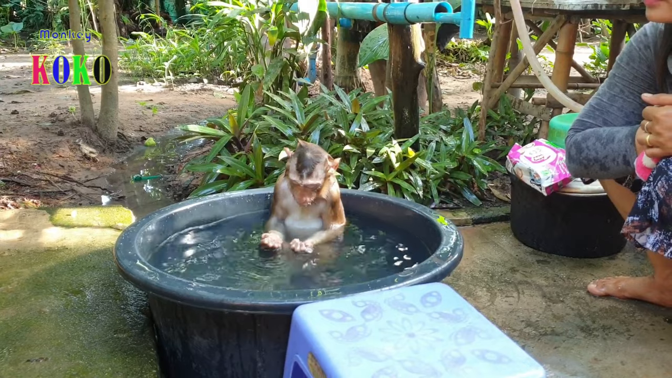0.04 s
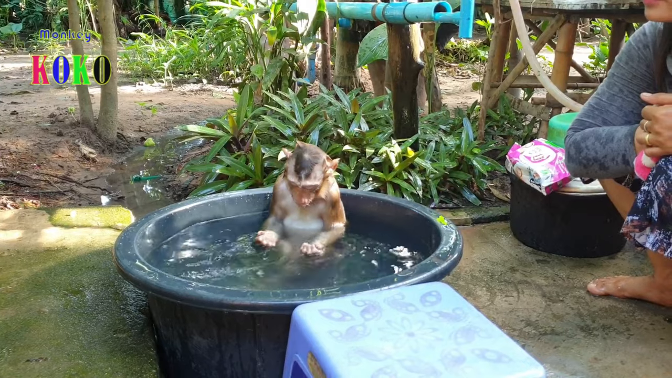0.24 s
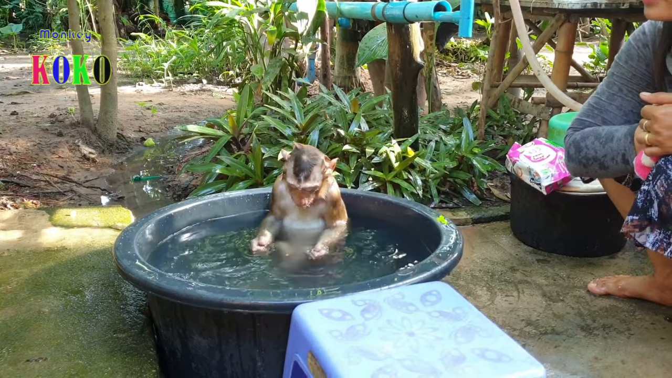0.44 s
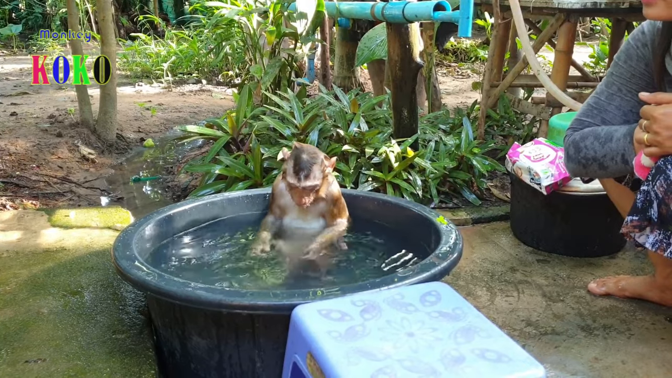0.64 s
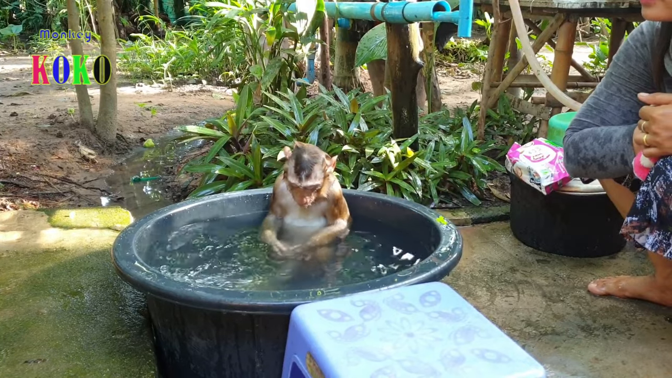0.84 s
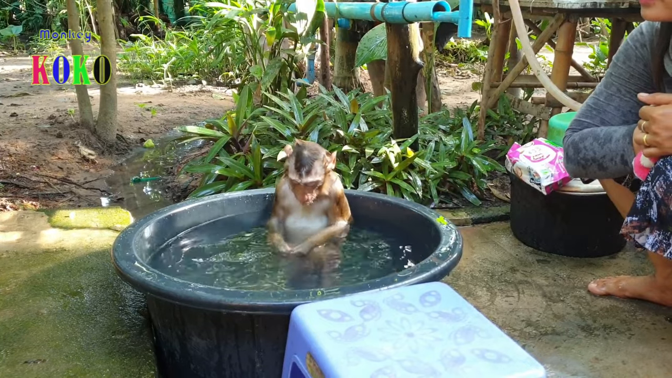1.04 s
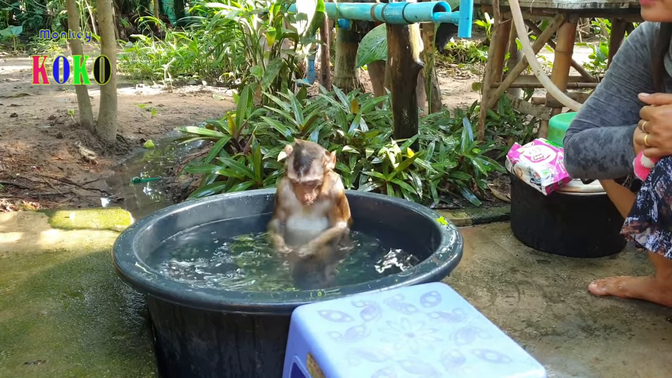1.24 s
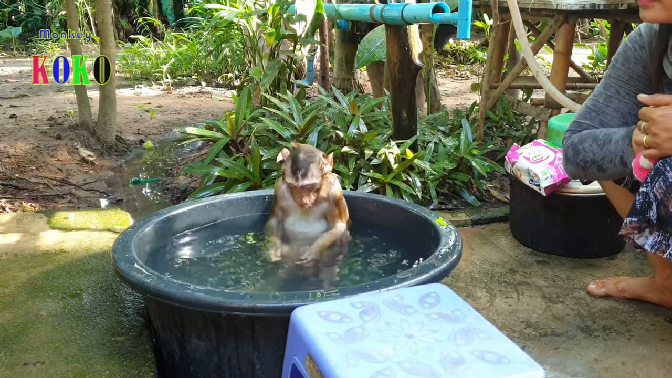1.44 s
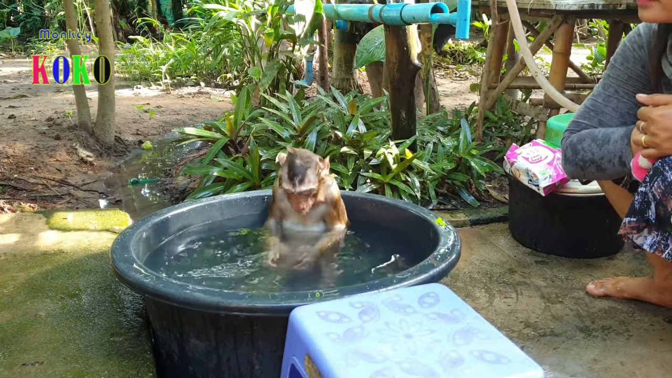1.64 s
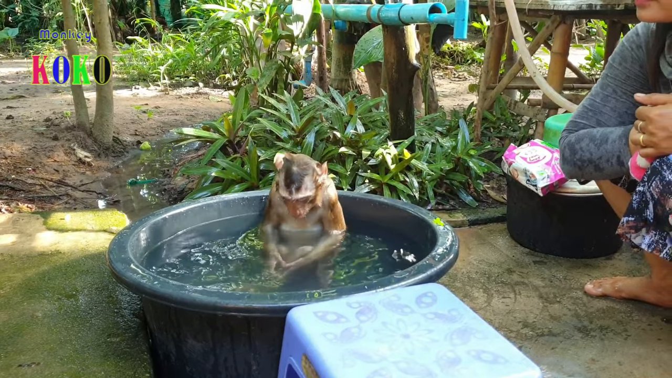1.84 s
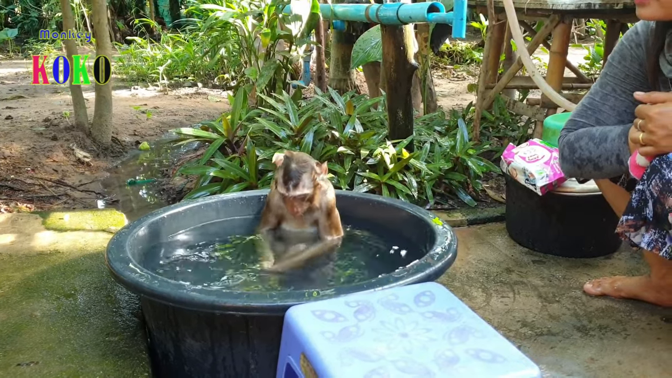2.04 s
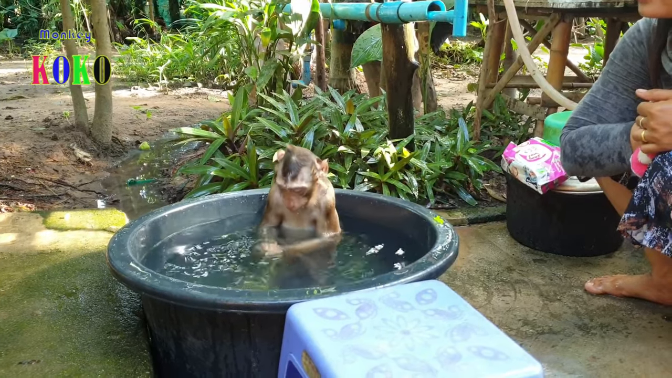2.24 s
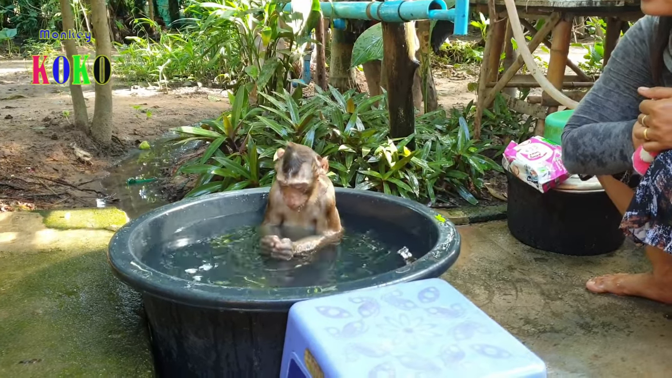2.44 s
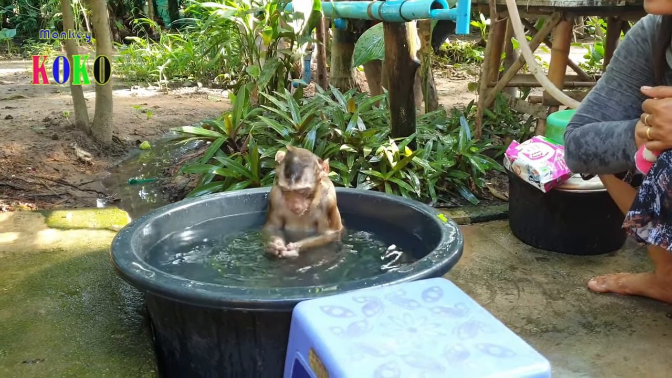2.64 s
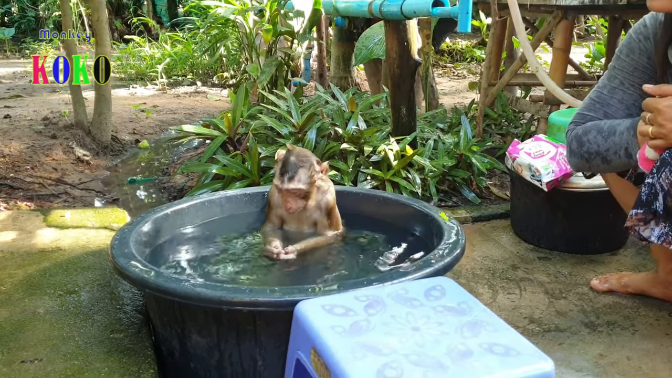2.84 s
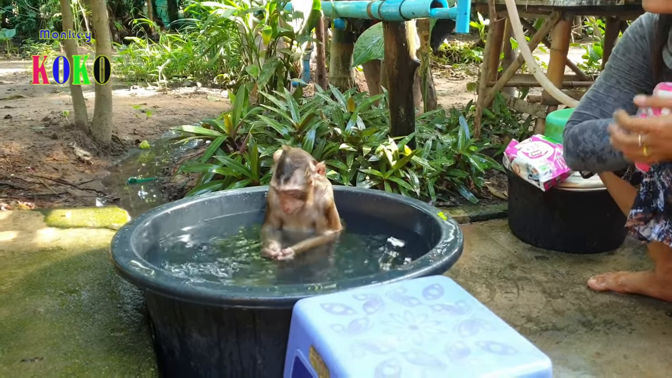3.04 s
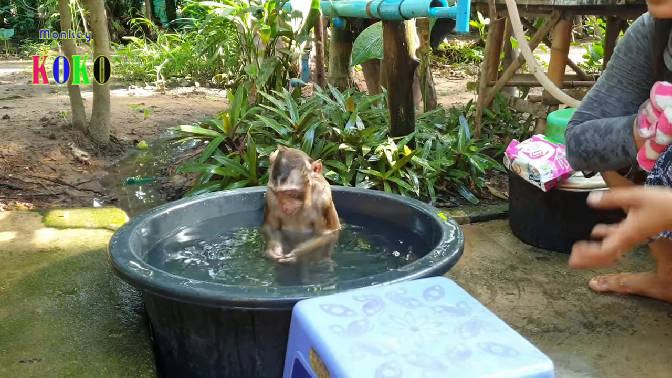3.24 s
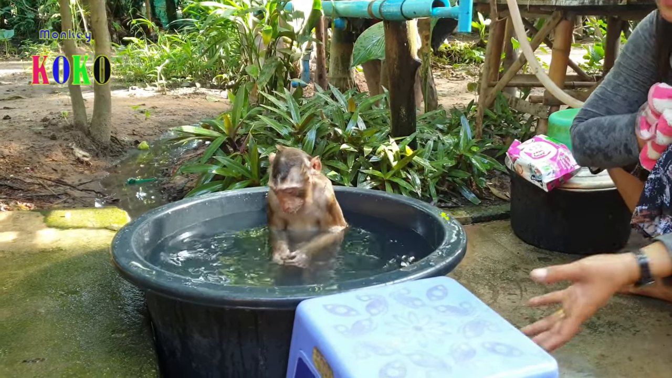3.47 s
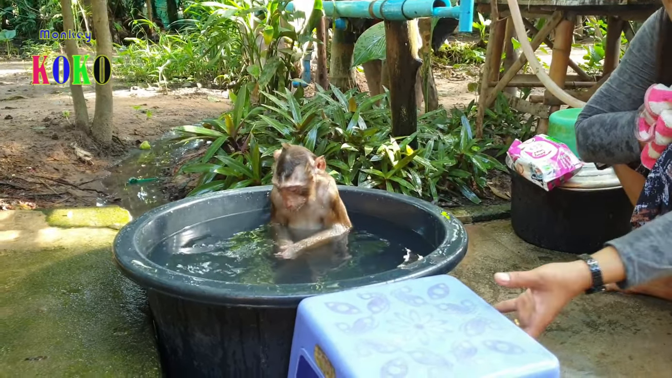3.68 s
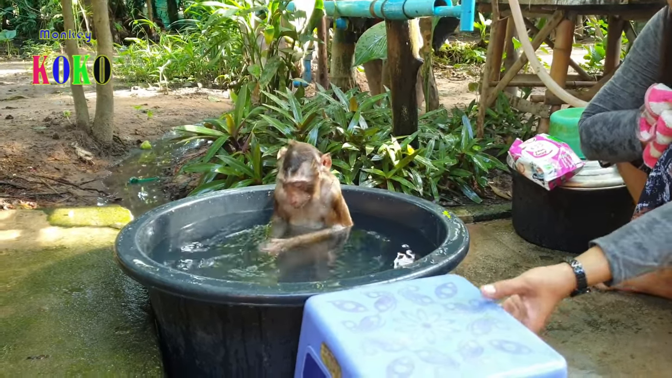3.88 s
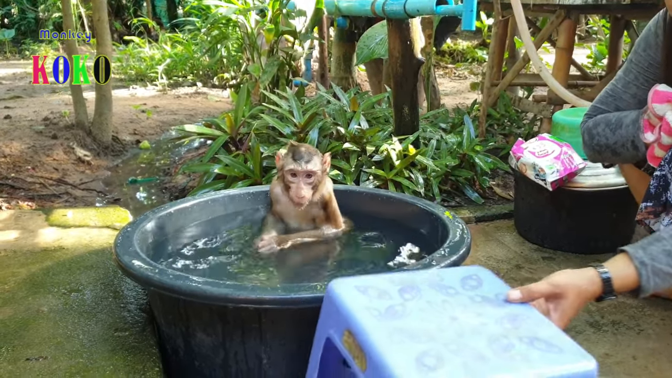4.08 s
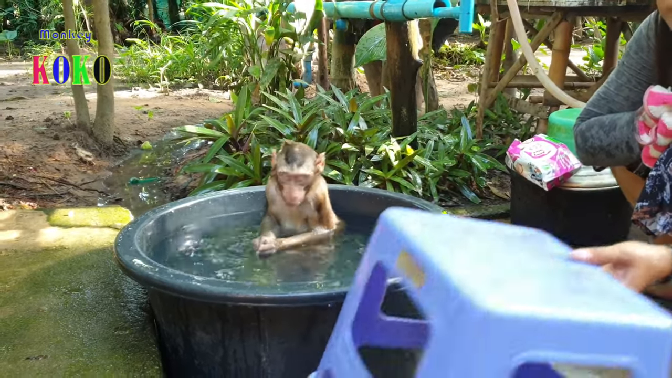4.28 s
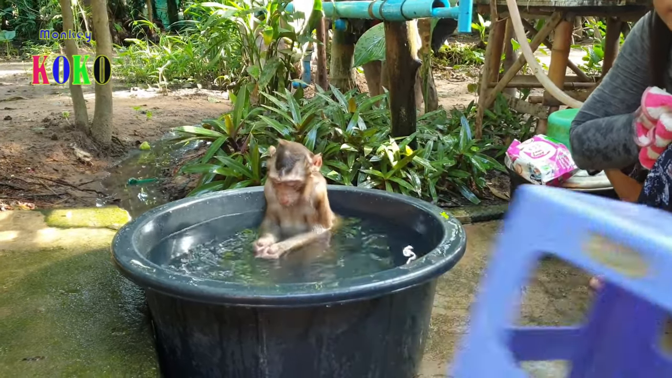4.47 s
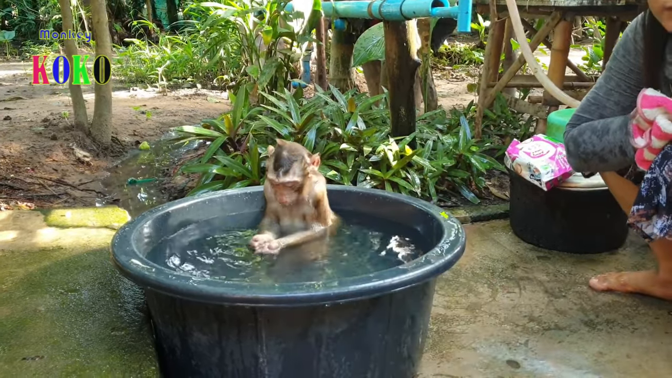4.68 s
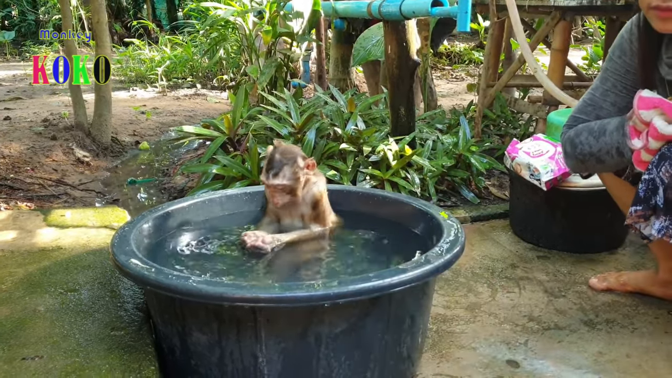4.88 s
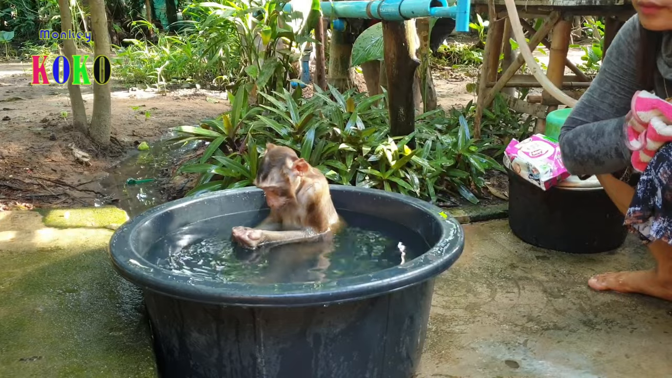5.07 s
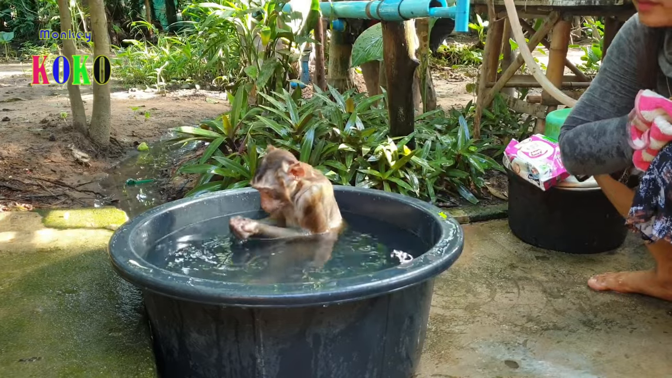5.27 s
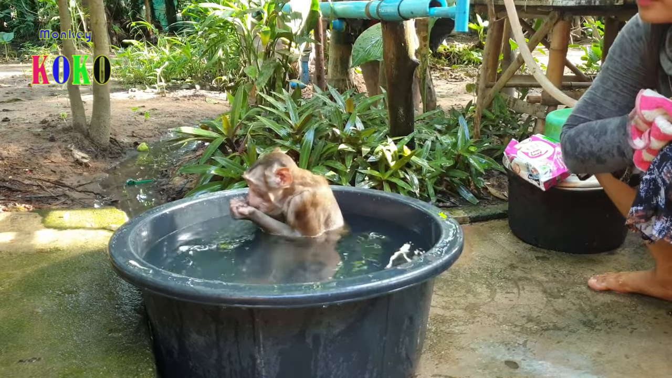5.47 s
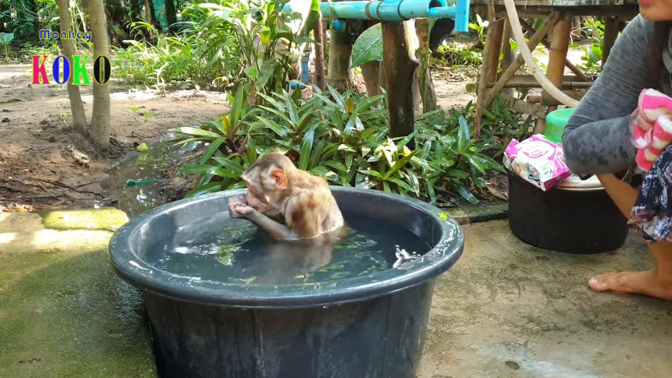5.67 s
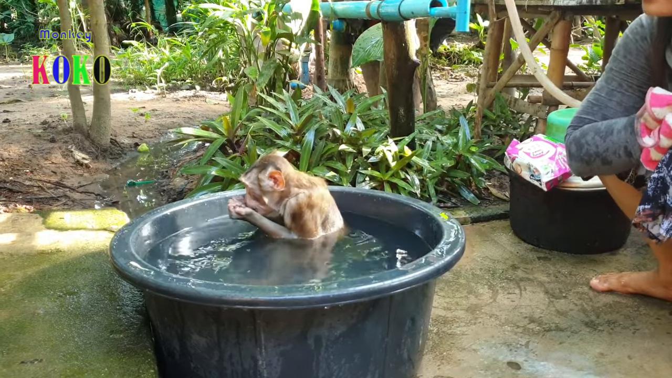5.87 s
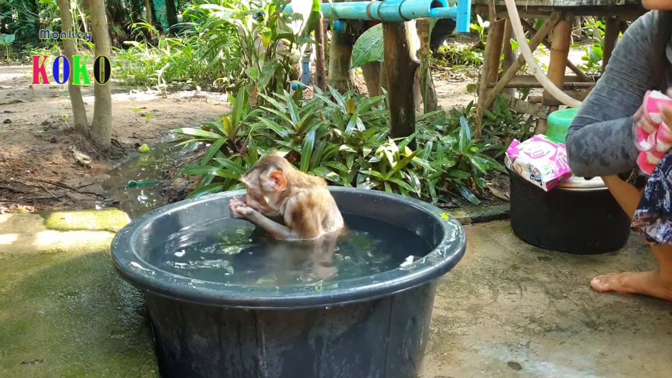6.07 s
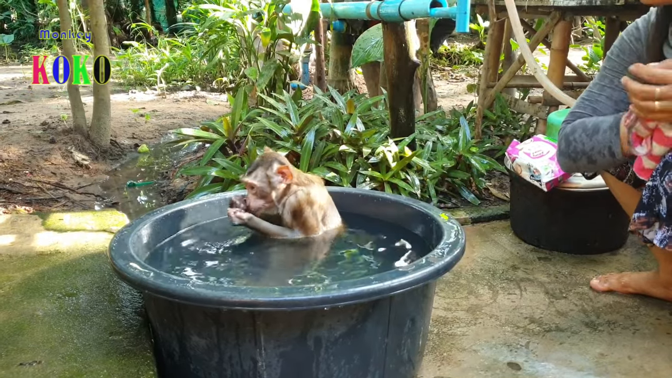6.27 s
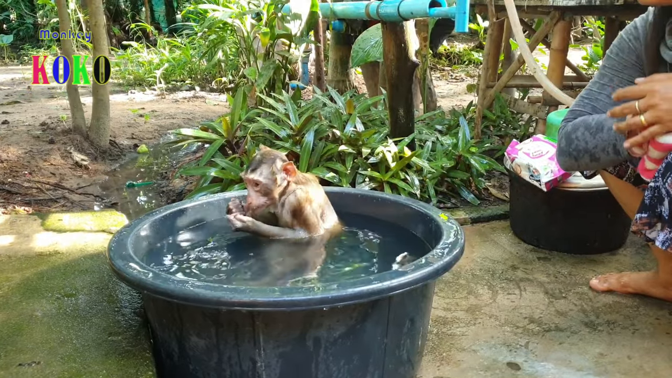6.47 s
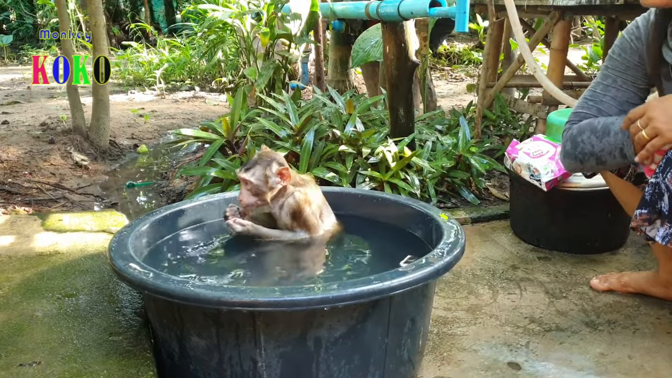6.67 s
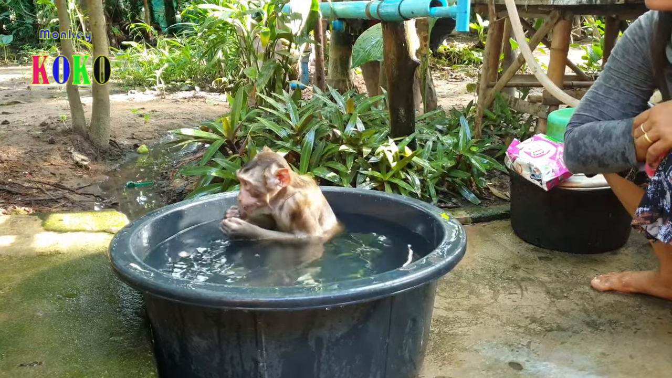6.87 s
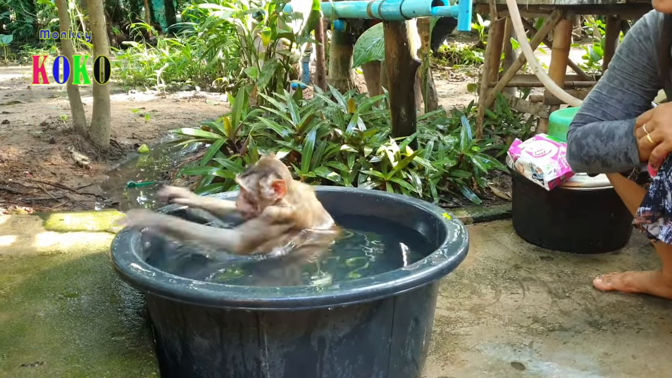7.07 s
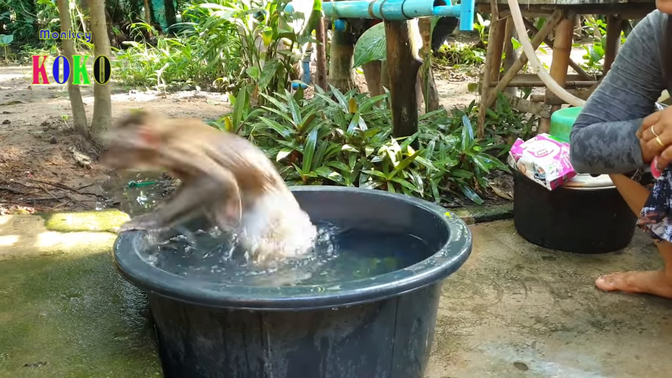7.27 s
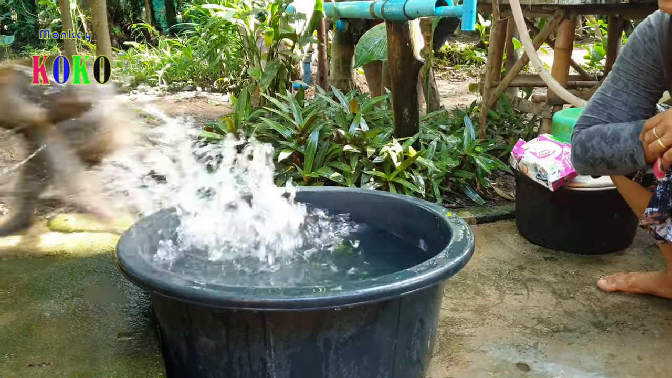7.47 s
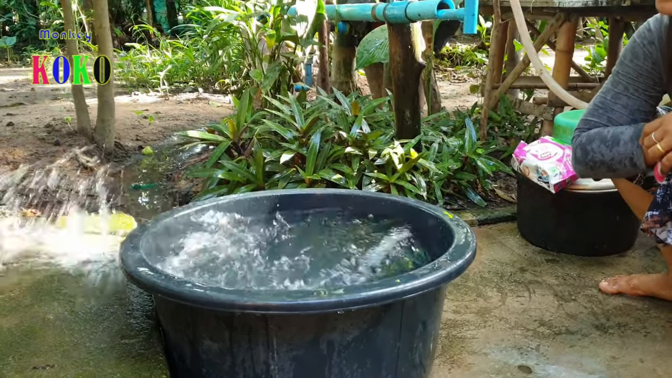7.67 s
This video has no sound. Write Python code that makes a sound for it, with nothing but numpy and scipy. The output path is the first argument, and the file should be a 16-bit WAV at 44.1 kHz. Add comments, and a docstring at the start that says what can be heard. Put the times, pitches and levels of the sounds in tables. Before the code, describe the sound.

Outdoors in a calm garden, a bird repeats a raspy falling chirp over three times a second while another hoots softly far away. Faint insects and a low distant engine lie beneath. Clothes rustle nearby; a plastic stool clacks as it is picked up and thuds and scrapes when set down. Near the end a small monkey leaps from a water tub with a loud, bubbly splash and spray, slightly left of the stereo microphones.

```python
"""A young monkey leaps out of a plastic tub in a garden with a loud splash: noise slaps, ringing bubbles and spray.
Before that someone close by shifts in rustling clothes (swelling grainy noise) and moves a plastic stool,
whose knocks ring decaying modes and whose feet drag. A bird repeats a falling chirp in the trees and another
hoots far off, both gliding tones smeared by reflections. Narrow bands of noise make the insects
and a distant engine, over coloured noise for the still air."""
import sys
import numpy as np
from scipy import signal
from scipy.fft import rfft, irfft, next_fast_len
from scipy.io import wavfile
from scipy.ndimage import uniform_filter1d

SR = 44100
rng = np.random.default_rng(int(sys.argv[2]) if len(sys.argv) > 2 else 0)


def wrap_up_sound(samples):
    """Save the sound to the file named by the first command line argument, as 16-bit audio."""
    columns = np.atleast_2d(samples).T
    # keep every value between -1 and 1, then stretch to whole-number steps
    tamed = np.clip(columns, -1, 1)
    steps = np.round(tamed * 32767).astype(np.int16)
    wavfile.write(sys.argv[1], SR, steps)


N = 340445
TIME = np.arange(N) / SR

# Surges of water: a stir, the leap, the water falling back.
# Each row: peak in seconds, then levels of big bubbles, small bubbles and spray in dB, ahead of the tub's walls.
WATER_SURGES = [(7.16, -62.5, -63, -58.5), (7.33, -36.5, -34.5, -36.5), (7.677, -52, -55, -32.5)]
BIG_RISE_S, BIG_FALL_S = 0.07, 0.43   # big bubbles: time to climb or drop 20 dB around a surge


def from_db(db):
    """Decibels to gain."""
    return 10 ** (np.asarray(db) / 20)


def rms_one(x):
    """Scale to unit power."""
    return x / np.sqrt(np.mean(x ** 2) + 1e-20)


def per_bin(points, size):
    """Read a (Hz, value) table at the FFT bins of a signal, on a log frequency scale."""
    hz, value = np.transpose(points)
    bins_hz = np.fft.rfftfreq(size, 1 / SR)
    return np.interp(np.log(bins_hz + 1), np.log(hz), value)


def colour(x, points):
    """Filter by a smooth (Hz, dB) spectrum."""
    size = next_fast_len(x.shape[-1] + SR // 10)
    spectrum = rfft(x, size) * from_db(per_bin(points, size))
    return irfft(spectrum, size)[..., :x.shape[-1]]


def diffuse(size):
    """White stereo noise from all around, alike in the bass and nearly unrelated in the treble."""
    # Likeness of the two microphones. Each row: frequency in Hz, left-right correlation.
    likeness = [(100, 0.91), (600, 0.59), (1200, 0), (2500, 0.075), (5000, 0)]
    padded = next_fast_len(size)
    mid, side = rfft(rng.standard_normal((2, padded)))
    alike = np.clip(per_bin(likeness, padded), -1, 1)
    shared = np.sqrt(1 + alike) * mid
    opposed = np.sqrt(1 - alike) * side * [[1], [-1]]
    return irfft(shared + opposed, padded)[:, :size]


def narrow_noise(hz, width_hz):
    """A wavering tone: noise through a narrow band."""
    edges = [max(hz - width_hz / 2, 10), hz + width_hz / 2]
    band = signal.butter(2, edges, "band", fs=SR, output="sos")
    return rms_one(signal.sosfilt(band, diffuse(N)))


def grainy(spectrum, per_s, spread_db):
    """Noise made of grains of uneven strength that start at once and die in milliseconds."""
    born = rng.random(N) < per_s / SR
    unevenness = np.clip(rng.standard_normal(N), -2.5, 2.5)
    power = born * from_db(spread_db * unevenness) ** 2
    decay = np.exp(-1 / (0.0017 * SR))
    envelope = np.sqrt(signal.lfilter([1], [1, -decay], power + 1e-4))
    return rms_one(colour(diffuse(N) * envelope, spectrum))


def add(track, s, sound):
    """Mix a short sound in at a time."""
    at = round(s * SR)
    part = sound[..., max(-at, 0):max(N - at, 0)]
    track[..., max(at, 0):max(at, 0) + part.shape[-1]] += part


def scatter(x, t60, build_s):
    """Countless small reflections that build up and die away; the response has unit energy."""
    t = TIME[:SR]
    response = diffuse(SR) * from_db(-60 * t / t60) * (1 - np.exp(-t / build_s))
    response /= np.sqrt(np.sum(response ** 2, axis=1, keepdims=True))
    return signal.fftconvolve(np.atleast_2d(x), response, axes=1)[:, :N]


def swell(s, rise, fall, hold=0):
    """Gain that peaks at a moment and may hold; 20 dB lower a rise before and a fall after."""
    distance = np.maximum((s - TIME) / rise, (TIME - s - hold) / fall)
    return from_db(-20 * np.clip(distance, 0, 10))


def panned(x, left_db):
    """Lean to one side by a left-right level difference."""
    return x * from_db(np.array([[.5], [-.5]]) * left_db)


def whistle(shape, stretch, detune, overtone_db):
    """A gliding note with a weak octave and soft ends."""
    s, hz, db = np.transpose(shape)
    t = np.arange(0, s[-1] * stretch, 1 / SR) / stretch
    phase = 2 * np.pi * np.cumsum(np.interp(t, s, hz)) * (1 + detune) / SR
    tone = np.sin(phase) + from_db(overtone_db) * np.sin(2 * phase)
    return tone * from_db(np.interp(t, s, db)) * signal.windows.tukey(len(t), .15)


def garden():
    """Coloured noise for still air, noise bands on a far engine's harmonics and at the insects' pitches."""
    # Spectrum of the still air. Each row: frequency in Hz, relative level in dB.
    air_colour = [(30, -4.5), (55, 2), (120, -4.5), (200, -16.5), (350, -21), (600, -32.5), (1200, -35.5),
                  (2100, -40), (3400, -26), (4400, -35), (6200, -34), (8800, -46.5), (11200, -38),
                  (13500, -52), (16000, -46)]
    # Steady insects. Each row: centre in Hz, width in Hz, level in dB ahead of the microphones.
    insect_bands = [(1763, 230, -82.5), (5197, 270, -78.5), (6660, 660, -81.5)]
    air_db = -61
    firing_hz, engine_db = 56.62, -60.5   # engine_db is the lowest harmonic
    air = from_db(air_db) * rms_one(colour(diffuse(N), air_colour))
    engine = sum(from_db(engine_db - 3.57 * k ** 1.427) * narrow_noise((k + 1) * firing_hz, 18.9)
                 for k in range(5))
    insects = sum(from_db(db) * narrow_noise(hz, width) for hz, width, db in insect_bands)
    surge = np.cos(2 * np.pi * (TIME - .62) / 1.13)
    shrill = from_db(-82.5 + 4.3 * surge) * narrow_noise(7340, 530)   # one insect swells about once a second
    swish = from_db(-70.5) * swell(1.018, .15, .18) * narrow_noise(11300, 2420)   # a brief, very high swish
    return air + engine + insects + shrill + swish


def chirp_times():
    """Each run of chirps keeps its pace until the next one takes over."""
    # Runs of even chirping. Each row: first chirp in seconds, time between chirps in seconds.
    runs = [(-.075, .2985), (3.478, 0.27), (4.36, .292), (5.503, 0.28)]
    leap_s = WATER_SURGES[1][0]
    ends = [s for s, _ in runs[1:]] + [leap_s + runs[-1][1] / 2]   # the bird stops at the leap
    return np.concatenate([np.arange(s, end - period / 2, period) for (s, period), end in zip(runs, ends)])


def chirping_bird():
    """Each falling chirp arrives by many paths through the trees, which smear it into a rasp."""
    # Shape of one chirp. Each row: seconds from its start, pitch in Hz, relative level in dB.
    chirp = [(0, 3470, 3), (.016, 3880, -7.5), (.028, 3500, -1), (.045, 3050, -2), (.064, 2750, -8),
             (.088, 2230, -16.5)]
    lead_s, rasp = 0.0067, 0.39   # soft upstroke before the beat; depth of the flutter in the voice
    out, t, times = np.zeros((2, N)), TIME[:SR // 2], chirp_times()
    early = from_db(-60 * np.maximum(t - .05, 0) / 0.27) * (1 - np.exp(-t / 0.039))
    late = from_db(-16.5 - 60 * t / 0.89)
    echoes = early + late
    echoes /= np.sqrt(np.sum(echoes ** 2))
    flutter = 1 + rasp * narrow_noise(116, 154)[0]
    for s, (pace, pitch, effort) in zip(times, rng.standard_normal((len(times), 3))):
        note = from_db(.5 * effort) * whistle(chirp, 1 + 0.0491 * pace, .008 * pitch, overtone_db=-42)
        note = note * flutter[abs(round(s * SR)):][:len(note)]
        smeared = signal.fftconvolve(note[None], echoes * diffuse(len(t)), axes=1)
        add(out, s - lead_s, smeared)
    return out * from_db(np.interp(TIME, [1.8, 3.2], [-55.8, -53.8]))   # it grows a little louder


def hooting_bird():
    """Hoarse arched notes, heard only through the trees: a pickup, a long hoot, then any short ones, fading."""
    # Shape of one hoot. Each row: share of its length, pitch in Hz, relative level in dB.
    hoot = [(0, 940, -1.5), (.2, 1040, -4), (.42, 1116, 3), (.78, 1102, -2.5), (1, 940, -5.5)]
    # Phrases. Each row: long hoot in seconds, its relative level in dB, count of short hoots after it,
    # seconds from the long hoot to the first of them.
    phrases = [(.768, -56, 2, .412), (2.243, -55.5, 0, 0.42), (3.987, -55.5, 1, .505),
               (5.984, -58, 1, .452)]
    long_s, short_s = .195, 0.0663
    pickup_s, pickup_db = .09, -13.5   # a soft short hoot leads into each long one
    after_db, after_fade_db = -10.5, -3.5   # first short hoot re the long one; each further one
    after_hurry = .85   # each gap between the short hoots, as a share of the one before
    calls = np.zeros(N)
    for s, db, after, gap in phrases:
        notes = [(s - pickup_s, short_s, db + pickup_db), (s, long_s, db)]
        delays = np.cumsum(gap * after_hurry ** np.arange(round(after)))
        notes += [(s + delay, short_s, db + after_db + k * after_fade_db) for k, delay in enumerate(delays)]
        for at, length, note_db in notes:
            note = whistle(hoot, length, 0.007 * rng.standard_normal(), overtone_db=-18)
            add(calls, at, from_db(note_db) * note)
    hoarse = 1 + .85 * narrow_noise(150, 220)[0]
    return scatter(calls * hoarse, t60=0.44, build_s=0.0035)


def rustles():
    """Cloth and scuffs as swelling grainy noise: light brushes mostly hiss, heavier scuffs have body as well."""
    # Brushes and scuffs. Each row: start in seconds, length in seconds, hiss level in dB, body in dB re the hiss.
    brushes = [(2.623, 0.077, -91, 14.5), (2.762, .025, -66.5, 8.5), (3.012, .025, -68.5, -12),
               (3.895, 0.012, -70, 6), (5.025, 0.026, -70, -24), (5.305, 0.035, -60, -11),
               (5.44, 0.043, -55.5, -1.5), (6.102, 0.27, -61.5, -9.5), (6.799, 0.05, -66.5, -22)]
    # Spectrum of the hiss. Each row: frequency in Hz, relative level in dB.
    hiss_colour = [(1500, -36), (4000, -0.5), (7000, 2), (11000, -1.5), (16000, -1)]
    # Spectrum of the body. Each row: frequency in Hz, relative level in dB.
    body_colour = [(200, -7.5), (700, -11), (1400, -10), (2100, -2), (4000, -6), (8000, -14), (16000, -40)]
    rise_s, fall_s = 0.06, 0.16
    gains = [from_db(db) * swell(s, rise_s, fall_s, length) for s, length, db, _ in brushes]
    body_gain = sum(gain * from_db(row[-1]) for gain, row in zip(gains, brushes))
    hiss = sum(gains) * grainy(hiss_colour, per_s=3500, spread_db=2)
    return hiss + body_gain * grainy(body_colour, per_s=2100, spread_db=2.5)


def dragging():
    """Loudness of the stool's feet scraping over the ground, changing steadily along each drag."""
    # Drags. Each row: start in seconds, length in seconds, relative level at the start in dB, growth in dB per second.
    drags = [(3.87, 0.1, -52, -15), (5.302, .18, -57, 37)]
    rise_s, fall_s = 0.032, .06
    return sum(from_db(db + growth * np.clip(TIME - s, 0, length)) * swell(s, rise_s, fall_s, length)
               for s, length, db, growth in drags)


def stool():
    """Soft thuds wake the low modes, hard clacks the high ones; sand crunches under the feet."""
    # Knocks on the ground. Each row: time in seconds, then relative levels of thud, clack and grit in dB.
    knocks = [(3.88, -53, -57, -73.5), (3.898, -42.5, -39, -60), (3.944, -58, -53, -75.5),
              (3.984, -59, -47.5, -71.5), (5.281, -39, -65.5, -72), (5.298, -37.5, -56, -45.5),
              (5.433, -48, -57, -45.5), (5.44, -43, -50.5, -51), (5.464, -47, -56, -49),
              (5.483, -51, -41, -59.5)]
    # Ringing modes of the plastic. Each row: frequency in Hz, relative level in dB.
    ringing = [(115, -3), (172, 0.5), (220, -0.5), (295, -3.5), (385, 2.5), (560, -0.5), (720, -1.5),
               (930, -1), (1350, -3.5), (1750, -7.5), (2150, -12), (2650, -10.5)]
    # Spectrum of the scraping feet. Each row: frequency in Hz, relative level in dB.
    drag_colour = [(60, 3), (140, 2), (300, 0.5), (600, -1), (1100, -9), (2000, -1.5), (3200, -20.5),
                   (8000, -29), (16000, -40)]
    out, t = np.zeros((2, N)), TIME[:SR // 4]
    hz, mode_db = np.transpose(ringing)[:, :, None]
    t60 = .034 * (1000 / hz) ** 0.59   # high modes die first
    hard = np.clip(np.log2(hz / 210), 0, 1)   # 0: woken by the thud, 1: by the clack
    for s, thud_db, clack_db, grit_db in knocks:
        strength_db = mode_db + thud_db * (1 - hard) + clack_db * hard + 2 * rng.standard_normal(hz.shape)
        sign = rng.choice([-1, 1], hz.shape)
        modes = sign * from_db(strength_db - 60 * t / t60) * np.sin(2 * np.pi * hz * t)
        grit = diffuse(len(t)) * from_db(grit_db - 60 * t / 0.048)
        add(out, s, modes.sum(axis=0) + grit)
    out += dragging() * grainy(drag_colour, per_s=700, spread_db=9)
    return out + from_db(-6) * scatter(out, t60=0.18, build_s=0.0045)


def bubble(hz, cycles, rise):
    """An air pocket rings for some cycles, rising in pitch as it nears the surface."""
    onset_cycles = 0.18   # time constant of pinching off and starting to ring
    age = np.arange(0, 1, hz / (cycles * SR))
    onset = 1 - np.exp(-age * cycles / onset_cycles)
    return np.sin(2 * np.pi * cycles * age * (1 + rise * age / 2)) * onset * from_db(-60 * age)


def bubble_cloud(low_hz, high_hz, cycles, spread_db, apart, count):
    """Bubbles of random size burst all over the tub, up to apart/2 s early or late at the right; level evened."""
    out, start = np.zeros((2, N)), WATER_SURGES[0][0] - BIG_RISE_S
    for when, pitch, size, place in rng.random((count, 4)):
        hz = low_hz * (high_hz / low_hz) ** pitch
        ring = from_db(spread_db * size) * bubble(hz, cycles, rise=0.071)
        s = start + when * (TIME[-1] - start)
        add(out[0], s, ring)
        add(out[1], s + apart * (place - .5), ring)
    power = uniform_filter1d(np.mean(out ** 2, axis=0), size=SR // 30)
    return out / np.sqrt(np.abs(power) + 1e-4)


def surging(times, levels_db, rise, fall):
    """Surges build quickly and ebb slowly; their powers add."""
    return np.sqrt(sum((from_db(db) * swell(s, rise, fall)) ** 2 for s, db in zip(times, levels_db)))


def splash():
    """The body heaves out, off to the left: deep gulps, then spray raining on water and ground."""
    # The loudest slaps and the air pocket each traps.
    # Each row: time in seconds, relative crack level in dB, pocket pitch in Hz, relative pocket level in dB.
    slaps = [(7.08, -82, 2390, -51.5), (7.164, -57, 2420, -44), (7.258, -74, 950, -34.5),
             (7.289, -70, 3050, -30), (7.319, -37, 968, -23), (7.347, -49, 940, -20.5),
             (7.393, -35, 906, -20), (7.41, -29.5, 1950, -31), (7.436, -31.5, 2500, -45),
             (7.456, -47.5, 608, -27.5), (7.479, -38, 1250, -25), (7.526, -50, 554, -26.5),
             (7.549, -25, 1170, -32)]
    # Spectrum of spray and cracks. Each row: frequency in Hz, relative level in dB.
    spray_colour = [(250, 3), (700, -14), (2500, -0.5), (5000, 3), (7500, 1), (9000, -1.5), (12000, -0.5),
                    (16000, 0)]
    small_rise_s, small_fall_s = 0.056, 0.45
    spray_rise_s, spray_fall_s = 0.05, 3.3   # the spray lasts longest
    s, big_db, small_db, spray_db = np.transpose(WATER_SURGES)
    # the hollow left by the body closes in a burst of big bubbles
    collapse = from_db(-29.5) * swell(7.357, rise=0.048, fall=0.068)
    big = np.hypot(surging(s, big_db, BIG_RISE_S, BIG_FALL_S), collapse)
    small = surging(s, small_db, small_rise_s, small_fall_s)
    spray = surging(s, spray_db, spray_rise_s, spray_fall_s)
    out = big * bubble_cloud(756, 1660, cycles=25.4, spread_db=17.5, apart=0.00039, count=500)
    out += small * bubble_cloud(1800, 3380, cycles=19, spread_db=32, apart=0.00043, count=800)
    out += spray * grainy(spray_colour, per_s=3600, spread_db=7)
    t = TIME[:SR // 10]
    for at, crack_db, hz, pocket_db in slaps:
        crack = diffuse(len(t)) * from_db(crack_db - 60 * t / 0.045)
        add(out, at, colour(crack, spray_colour))
        add(out, at, from_db(pocket_db) * bubble(hz, 0.84 * np.sqrt(hz), rise=0.2))
    out += from_db(-5.5) * scatter(out, t60=0.16, build_s=0.0041)   # the tub's walls
    # a small pool radiates little bass
    out = signal.sosfilt(signal.butter(3, 480, "high", fs=SR, output="sos"), out)
    return panned(out, left_db=3.0)


def scene():
    """Everything together; the chirping bird is off to the right."""
    birds = panned(chirping_bird(), left_db=-2.2) + hooting_bird()
    return garden() + birds + rustles() + stool() + splash()


def record(dry):
    """The right microphone's port has resonances of its own; deep bass and the top are cut."""
    # Right microphone re the left. Each row: frequency in Hz, gain in dB.
    right_port = [(60, 2.5), (500, 2.5), (1100, 4), (1700, 6), (2700, 11), (3800, 9), (5100, 4.5),
                  (6300, 9), (7400, 14.5), (8500, 0), (10600, 17.5), (12000, 13.5), (14000, 7),
                  (16000, -12)]
    cutoff_hz = 15800
    heard = np.array([dry[0], colour(dry[1], right_port)])
    heard = signal.sosfilt(signal.butter(6, 40, "high", fs=SR, output="sos"), heard)
    return signal.sosfilt(signal.ellip(10, .2, 80, cutoff_hz, fs=SR, output="sos"), heard)


dry = scene()
out = record(dry)
wrap_up_sound(out)
```